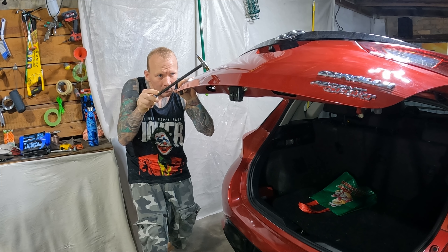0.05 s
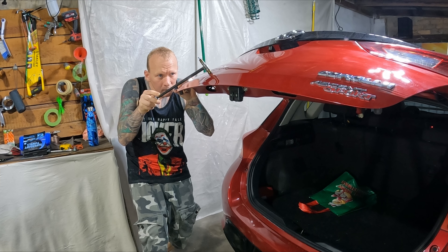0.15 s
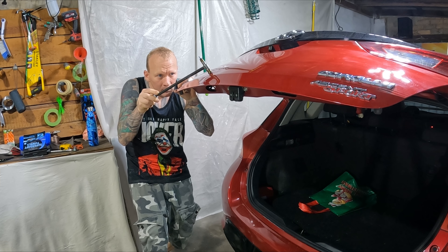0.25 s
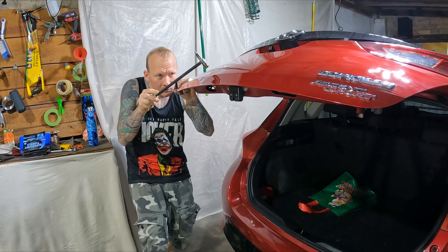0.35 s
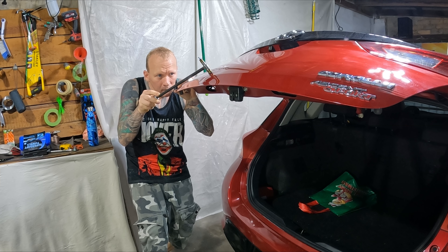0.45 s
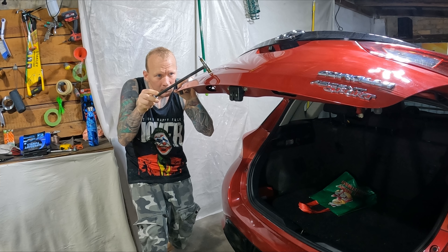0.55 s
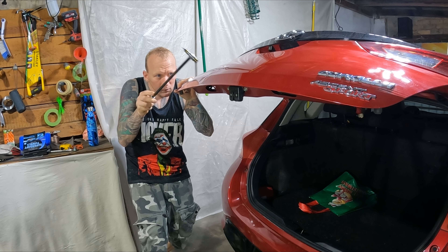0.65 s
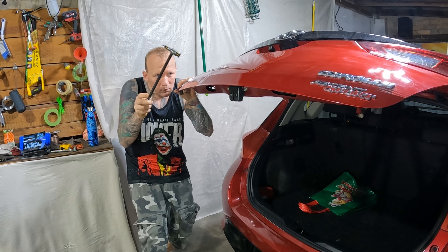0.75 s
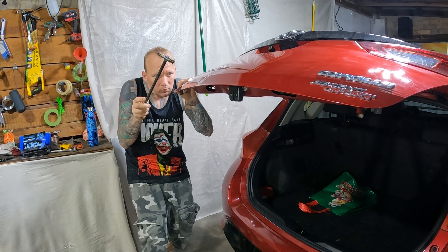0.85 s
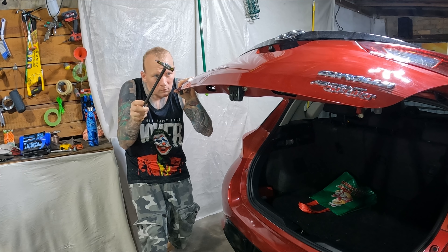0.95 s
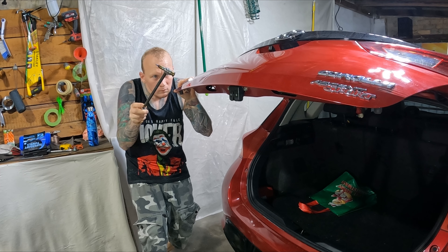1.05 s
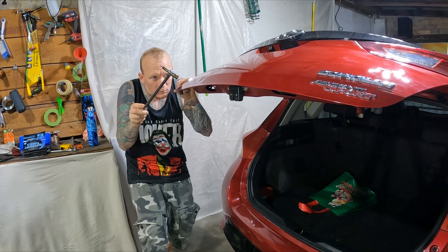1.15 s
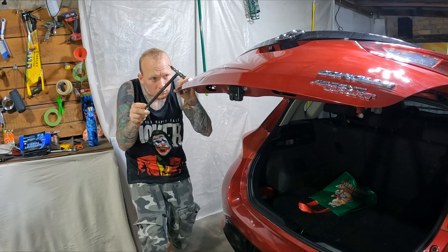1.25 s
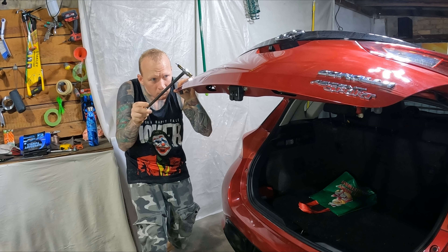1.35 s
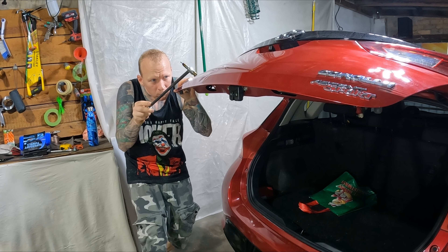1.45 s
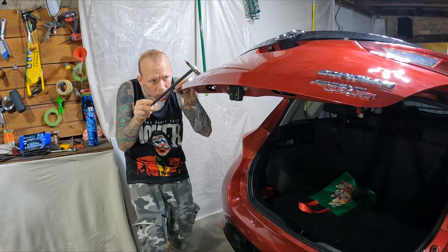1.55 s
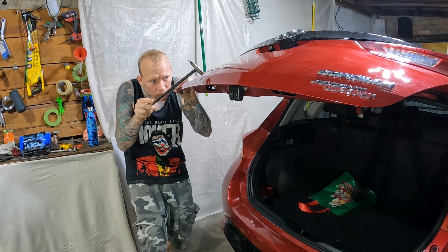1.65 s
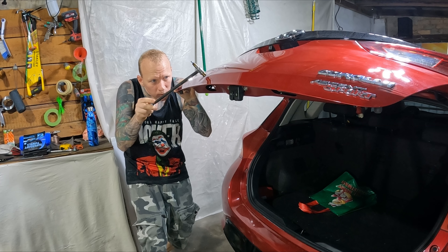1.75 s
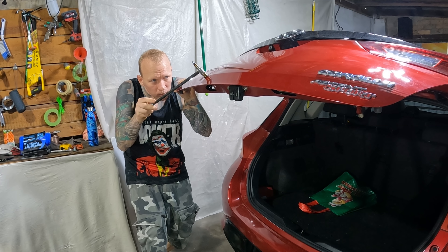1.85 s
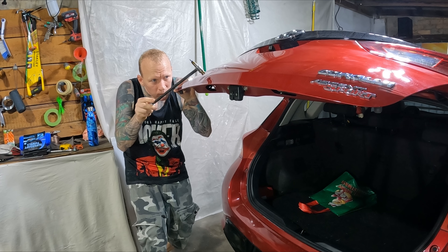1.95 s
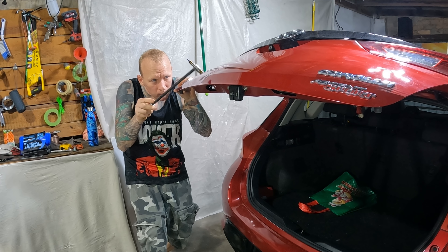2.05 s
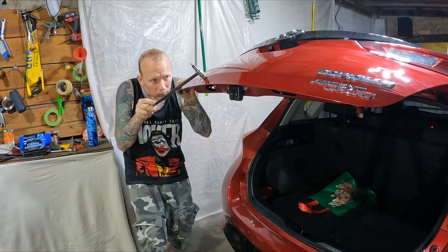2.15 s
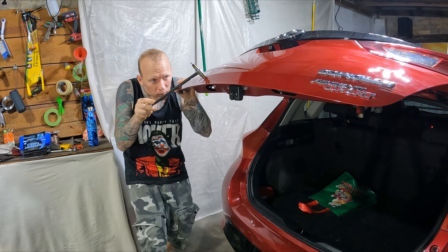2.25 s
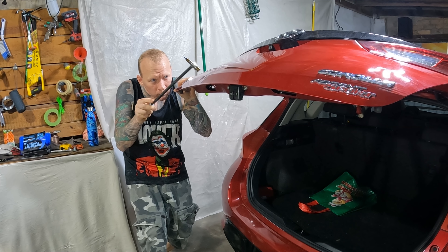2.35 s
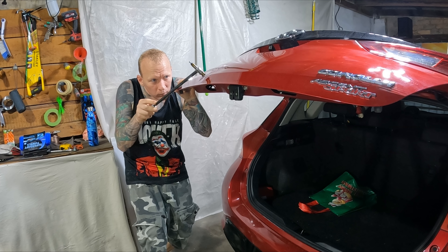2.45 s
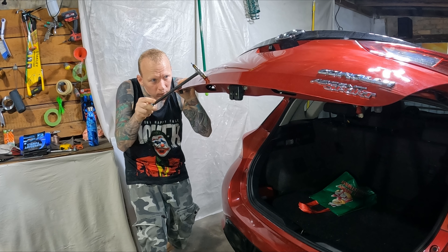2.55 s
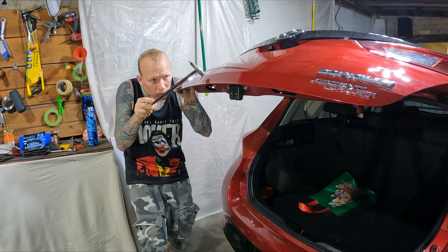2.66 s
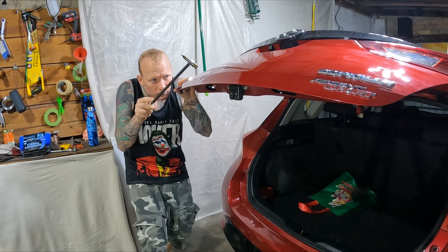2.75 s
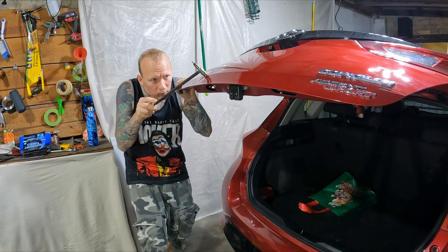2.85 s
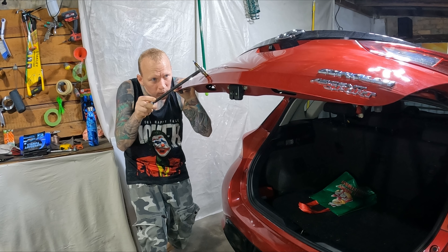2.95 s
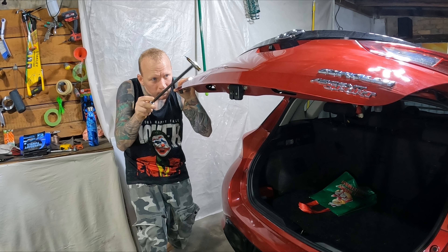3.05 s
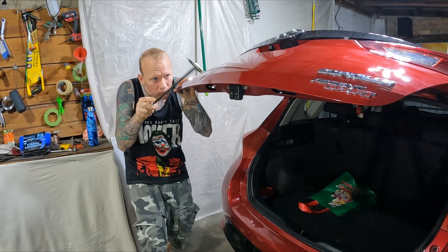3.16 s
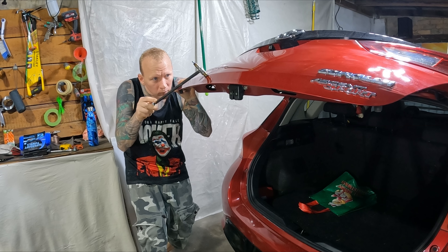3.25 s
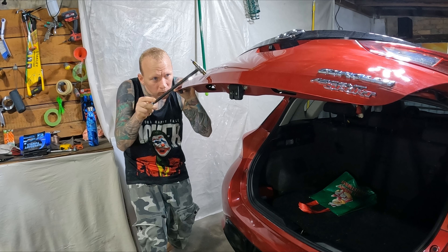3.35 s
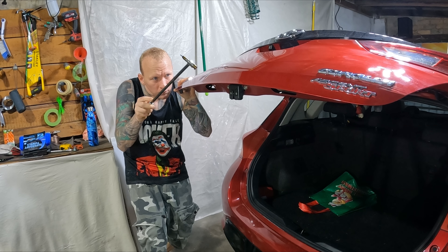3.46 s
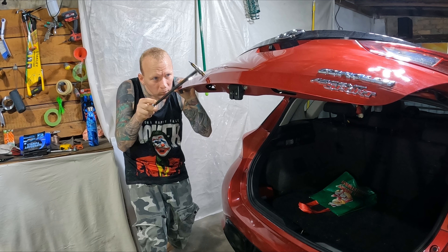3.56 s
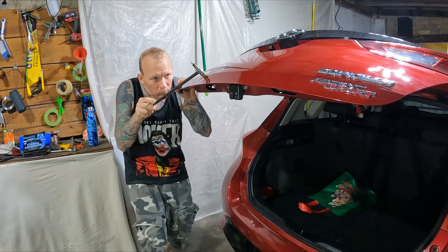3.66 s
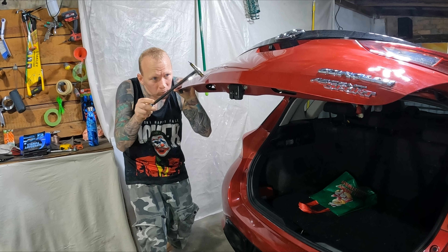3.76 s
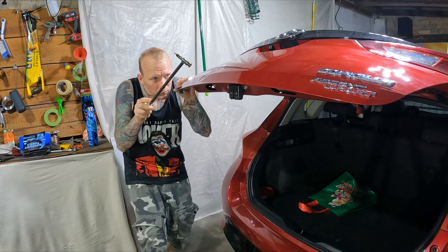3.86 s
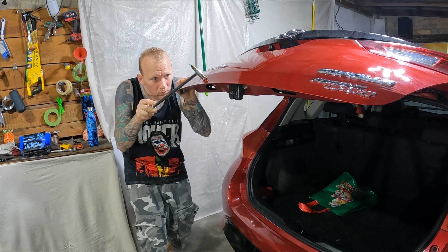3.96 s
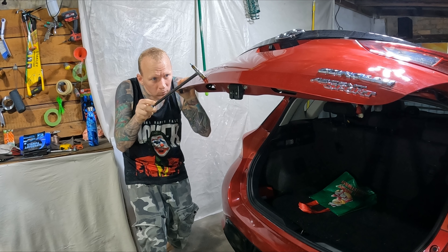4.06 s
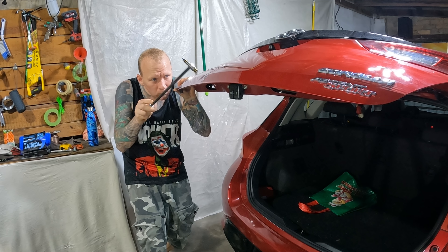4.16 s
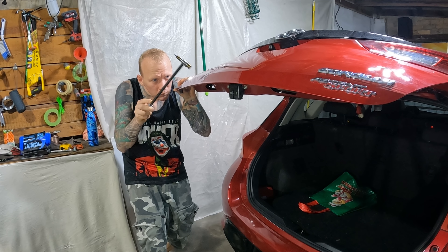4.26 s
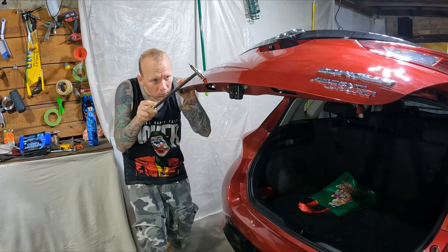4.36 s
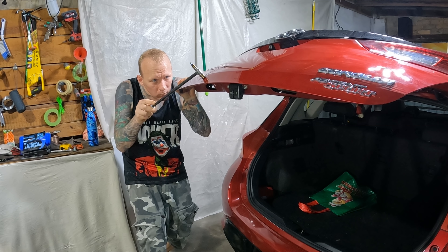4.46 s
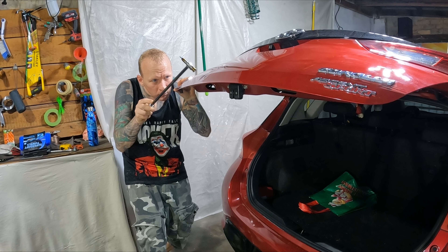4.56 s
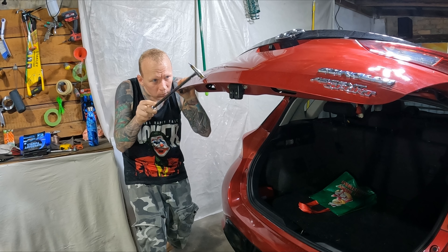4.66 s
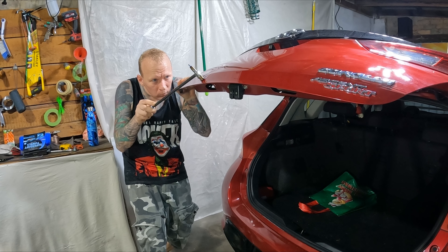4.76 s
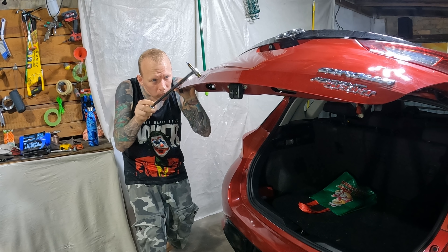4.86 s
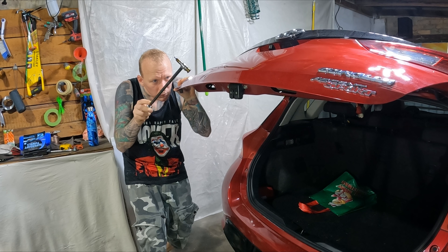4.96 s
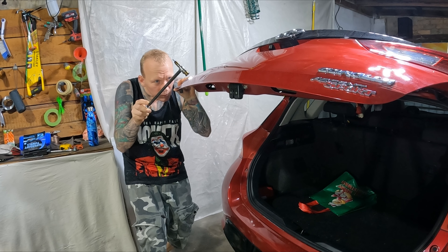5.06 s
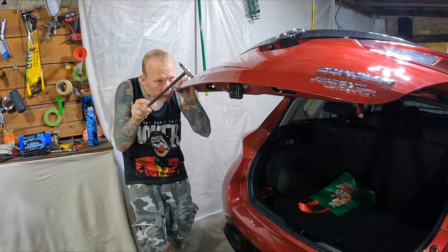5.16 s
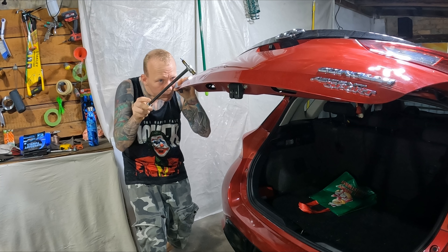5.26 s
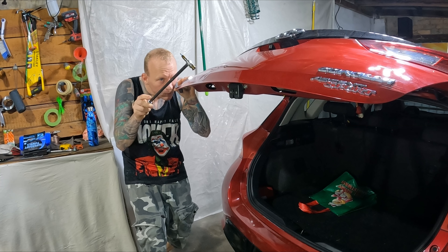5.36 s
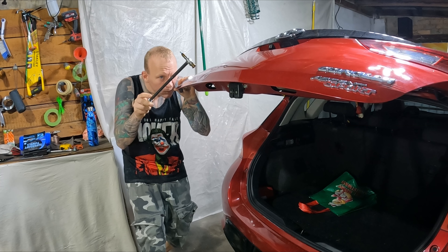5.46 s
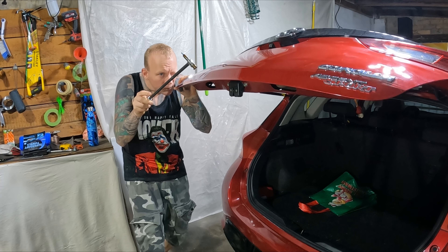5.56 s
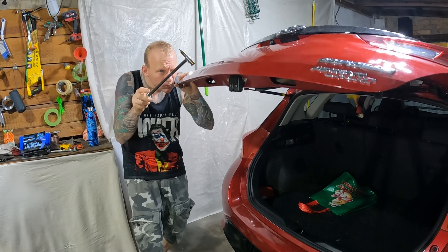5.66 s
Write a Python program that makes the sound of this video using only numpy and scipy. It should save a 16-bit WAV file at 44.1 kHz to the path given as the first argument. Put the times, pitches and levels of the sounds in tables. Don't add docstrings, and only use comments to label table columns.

```python
import sys
import numpy as np
from scipy import signal
from scipy.io import wavfile
from scipy.ndimage import uniform_filter1d

SR = 44100
rng = np.random.default_rng(int(sys.argv[2]) if len(sys.argv) > 2 else 0)


def gain_from_db(level_db):
    decades = np.asarray(level_db, float) / 20
    return 10 ** decades


def pcm_store(signal):
    levels = np.round(np.clip(np.atleast_2d(signal), -1, 1) * 32767)
    wavfile.write(sys.argv[1], SR, levels.astype(np.int16).T)


N = 251370
LEAD = int(.1 * SR)
RING_TIME = np.arange(int(.7 * SR)) / SR

# (time [s], peak [dB], knock against peak [dB], rebound after [s], rebound weight [dB])
EARLIER_BLOW = [
    (-.03, -10, -19, .0394, -5.5),
]
BLOWS = [(0.2446, -6.5, -10.5, .0298, -10.5), (0.5204, -4.5, -11.5, .031, -19.5),
         (1.9025, -7.5, -4, 0.03, -8), (2.2084, -3, -4.5, 0.035, -5), (2.565, -3, -4.3, 0.034, -1.5),
         (2.9209, -3.5, -3, 0.033, -3.5), (3.2959, -4, -4.5, .0338, -1), (3.6717, -4, -5, 0.039, -1),
         (4.0475, -3, -7.5, .0363, -2.5), (4.4354, -5.5, -5, 0.034, -1.5), (4.778, -4, -8, .030, -3.5)]
MOVES = [
    1.2,
    3.9,
]


def at_hz(points, hz):
    table = np.array(points)
    return np.interp(np.log(hz), np.log(table[:, 0]), table[:, 1])


def rms_one(x):
    return x / np.sqrt(np.mean(x ** 2) + 1e-20)


def clicks(times, gains):
    out = np.full(N + LEAD, 1e-18)
    out[np.round(np.asarray(times) * SR).astype(int) + LEAD] = gains
    return out


def fold(x, response):
    return signal.fftconvolve(x[None], np.atleast_2d(response), axes=1)[:, :x.size]


def swell(s, gain, modes, order=2):
    t, wave = RING_TIME, 0
    for hz, db, rise in modes:
        envelope = (t / rise * np.exp(1 - t / rise)) ** order
        wave = wave + gain_from_db(db) * envelope * np.sin(2 * np.pi * hz * t)
    return fold(clicks(s, gain), wave)[0]


def bands(size, shape):
    # (frequency [Hz], left-right likeness [0-1])
    likeness = [(40, 1), (120, 1), (400, 0.94), (1000, 0.7), (3000, 0.61), (7000, 0.73), (11000, 0.87),
                (14000, .1)]
    # (frequency [Hz], left minus right [dB])
    balance = [(100, -1), (1000, 1.3), (6000, 0), (10000, 4), (14000, 10.5)]
    out, edges = 0, 22 * 2 ** np.arange(0, 9.7, 1 / 3)
    white = rng.standard_normal((2, 2, size + 8000))
    for k, (low, high) in enumerate(zip(edges, edges[1:])):
        band = signal.butter(2, [low, high], "band", fs=SR, output="sos")
        mid, side = signal.sosfilt(band, white[k % 2])[:, 8000:]
        hz = np.sqrt(low * high)
        alike = np.clip(at_hz(likeness, hz), 0, 1)
        lean = gain_from_db(at_hz(balance, hz) / 2)
        pair = np.sqrt(1 + alike) * mid + np.sqrt(1 - alike) * side * [[1], [-1]]
        out = out + shape(hz) * pair * [[lean], [1 / lean]]
    return out


def contacts():
    # (time [s], weight [dB])
    second_rebounds = [
        (2.2583, -9.5),
        (2.973, -7),
    ]
    boom_at_spot = [
        -2,
        -2.5,
        -4.5,
    ]
    s, peak_db, knock_db, after, rebound_db = np.transpose(EARLIER_BLOW + BLOWS)
    skip, skip_db = np.transpose(second_rebounds)
    later = np.r_[s + after, skip]
    parent = np.searchsorted(s, later) - 1

    weight_db = np.r_[peak_db, peak_db[parent] + np.r_[rebound_db, skip_db]] + 6
    tip_db = peak_db - 5 + 0.75 * knock_db + 7.5
    rebound_tip_db = tip_db[parent] + np.r_[-1.5 + 0 * s, -6.5 + 0 * skip]
    boom_db = np.array(boom_at_spot)[np.searchsorted(MOVES, s)]
    sway_db = -6 + 0.8 * peak_db

    def share(blow_db, softer_db):
        return weight_db + np.r_[blow_db, blow_db[parent] + softer_db]

    levels_db = [weight_db, np.r_[tip_db, rebound_tip_db],
                 share(knock_db, -4), share(boom_db, -2), share(sway_db, -1)]
    return np.r_[s, later], *gain_from_db(levels_db)


def hammer_knock(s, gain):
    # (frequency [Hz], level [dB], swell [s])
    knock_modes = [(1210, 1, .00105), (1050, -8, .005), (1500, -14, .005), (2100, -23, .003),
                   (2700, -27, .002), (3550, -31, .0015), (4100, -32, .0015)]
    knock = swell(s, gain, knock_modes, order=4)
    return np.array([np.roll(knock, 1), knock])


def tool_tip(s, gain):
    # (frequency [Hz], level [dB], swell [s])
    tip_modes = [(5814, -18, 0.0013), (5990, -12.5, 0.00067), (6270, -12.5, 0.00048),
                 (7550, -21.5, 0.00048), (10100, -18, 0.00022), (12500, -26, 0.00018)]
    # (time [s], level [dB])
    sets_tool = [
        (1.598, -58),
    ]
    set_s, set_db = np.transpose(sets_tool)
    return swell(np.r_[s + 0.00049, set_s], np.r_[gain, gain_from_db(set_db)], tip_modes, order=1)


def sheet_boom(s, gain):
    # (frequency [Hz], level [dB], swell [s])
    boom_modes = [(198.6, -14, 0.011), (266.8, -16, 0.022), (414.8, -3.5, 0.012)]
    return swell(s, gain, boom_modes)


def first_spot_hum(s, gain):
    # (frequency [Hz], level [dB], swell [s])
    hum_modes = [(431, -6.5, 0.013), (949.4, -11.5, 0.0095)]
    return swell(s, gain * (s < MOVES[0]), hum_modes, order=1)


def door_sway(s, gain):
    # (frequency [Hz], level [dB], swell [s])
    sway_modes = [(32.6, -40.5, 0.14), (56, -25, 0.07), (96.6, -19.5, 0.046)]
    return swell(s, gain, sway_modes)


def ring(x, hz, t60):
    r, w = gain_from_db(-60 / (t60 * SR)), 2 * np.pi * hz / SR
    return signal.lfilter([0, np.sin(w)], [1, -2 * r * np.cos(w), r * r], x)


def rough_mode(hz, t60, fill=0.048):
    blur_s = .24 * (500 / hz) ** .55
    clump = rms_one(ring(rng.standard_normal(RING_TIME.size + 8000), hz, blur_s)[8000:])
    return (1 - np.exp(-RING_TIME / fill)) * gain_from_db(-60 * RING_TIME / t60) * clump


def sheet(s, gain):
    # (frequency [Hz], first spot [dB], second spot [dB], third spot [dB])
    lasting_modes = [(157.1, -18.5, -20, -17), (236.4, -21, -18.5, -15.5), (265.2, -11, -12, -11),
                     (279.3, -9, -32, -17), (410, -14, -16, -24), (441.6, -14, -12, -20),
                     (480.7, -9, -22.5, -22.5), (516, -30, -41, -13), (370.5, -16.5, -19.5, -30.5),
                     (621, -6, -14, -6), (814, -55.5, -37, -44), (758, -9.5, -32, -16),
                     (909, -10.5, -21, -25), (976.5, -13, -11.5, -22), (1130, -42.5, -19, -9),
                     (1190, -28, -47, -47), (1320, -14, -35.5, -31), (1425, -13, -13, -17),
                     (1748, -24, -27.5, -21.5), (1624, -24.5, -16.5, -15.5), (2080, -40, -36, -40),
                     (2242, -40, -37, -41), (2800, -45, -44, -43), (3370, -45, -44, -46),
                     (3950, -47, -46, -47), (4240, -54, -45.5, -53), (5370, -36.5, -34.5, -47),
                     (5990, -43, -34.5, -44)]
    # (frequency [Hz], T60 [s])
    decay = [(150, .36), (270, .25), (430, .39), (630, .31), (1000, .31), (6000, .25)]
    chance_db = rng.normal(0, 1.5, (len(s), len(lasting_modes)))
    spot, out = np.searchsorted(MOVES, s), 0
    for (hz, *spot_db), luck_db in zip(lasting_modes, chance_db.T):
        strength = gain * gain_from_db(np.array(spot_db)[spot] + luck_db)
        out = out + fold(clicks(s, strength), rough_mode(hz, at_hz(decay, hz)))
    return out


def garage(s, gain, level_db=-24, fill=0.14):
    # (frequency [Hz], level [dB per Hz])
    tail = [(59, -50), (100, -14), (424, 1.5), (540, 3.5), (621, -7), (691, -8.5), (970, -4.5), (1230, -11),
            (1680, -12), (2470, -16), (2860, -19), (5770, -25.5), (12800, -41.5), (15000, -63)]
    # (frequency [Hz], T60 [s])
    tail_t60 = [(100, 0.38), (400, 0.32), (1500, 0.35), (5000, 0.34), (10000, 0.27), (14000, 0.13)]
    t = RING_TIME

    def dying(hz):
        rattle_db = 2.2 * np.interp(t * 90, np.arange(80), rng.standard_normal(80))
        level = at_hz(tail, hz) + rattle_db * (hz > 1500) - 60 * t / at_hz(tail_t60, hz)
        filling = 1 - 0.77 * np.exp(-t / fill)
        onset = 1 - np.exp(-t * hz / 5.7)
        return gain_from_db(level) * filling * onset

    turn = rng.uniform(0, np.pi / 2, len(s))
    out = 0
    for share in (np.cos(turn), np.sin(turn)):
        out = out + fold(clicks(s, gain * share), rms_one(bands(t.size, dying)))
    return gain_from_db(level_db) * out


def distant_hiss(since):
    # (frequency [Hz], level [dB per Hz])
    air = [(25, 0.5), (50, -11), (70, -14.5), (190, -14), (400, -23.5), (750, -22.5), (1100, -15.5),
           (1900, -17.5), (3000, -28), (7000, -38), (9000, -42.5), (12500, -55)]
    sink_db, return_s = 10.5, 1.17
    sunk_db = -sink_db * np.clip(1 - since / return_s, 0, 1)
    hiss = rms_one(bands(N, lambda hz: gain_from_db(at_hz(air, hz))))
    top_edge = signal.cheby2(14, 40, 13100, fs=SR, output="sos")
    return gain_from_db(-52 + sunk_db) * signal.sosfilt(top_edge, hiss)


def rumble(t, since):
    lump_db, lumps_per_s = 2.5, 5
    shake_db, shake_s = -51, 0.69
    low_band = signal.butter(2, [20, 62], "band", fs=SR, output="sos")
    noise = rms_one(signal.sosfilt(low_band, rng.standard_normal(N)))
    lumps_db = lump_db * np.interp(t * lumps_per_s, np.arange(200), rng.standard_normal(200))
    shake = gain_from_db(shake_db) * np.exp(-(since / shake_s) ** 2) * (t > MOVES[0])
    return (gain_from_db(-66) + shake) * gain_from_db(lumps_db) * noise


def background():
    t, s = np.arange(N) / SR, np.transpose(EARLIER_BLOW + BLOWS)[0]
    since = t - s[np.searchsorted(s, t) - 1]
    return distant_hiss(since) + rumble(t, since)


def scene():
    s, gain, tip_gain, knock_gain, boom_gain, sway_gain = contacts()
    sharp = hammer_knock(s, knock_gain) + tool_tip(s, tip_gain)
    sharp = sharp * gain_from_db([[-1.2], [1.2]])
    body = sheet_boom(s, boom_gain) + door_sway(s, sway_gain) + sheet(s, gain)
    blows = sharp + body + first_spot_hum(s, boom_gain) + garage(s, gain)
    return blows[:, LEAD:] + background()


def band_limit(x):
    return signal.sosfilt(signal.butter(12, 16400, fs=SR, output="sos"), x)


def record(dry):
    dry = signal.sosfilt(signal.butter(4, 13800, fs=SR, output="sos"), dry)
    port = signal.butter(1, [8000, 9800], "band", fs=SR, output="sos")
    dry = dry - 0.52 * signal.sosfilt(port, dry)

    level_db = 10 * np.log10(uniform_filter1d(np.mean(dry ** 2, axis=0), 220) + 1e-12)
    over_db = np.maximum(level_db + 31.5, 0)
    slope = 90 * np.arange(N) / SR
    held_db = np.maximum.accumulate(over_db + slope) - slope
    r = np.exp(-1 / (0.005 * SR))
    duck_db = -.3 * signal.lfilter([1 - r], [1, -r], np.maximum(held_db, 0))

    held = 1.59 * np.tanh(dry * gain_from_db(duck_db) / 1.608)
    held = signal.sosfilt(signal.cheby2(12, 50, 16300, fs=SR, output="sos"), held)
    return band_limit(held)


dry = scene()
out = record(dry)
pcm_store(out)
```